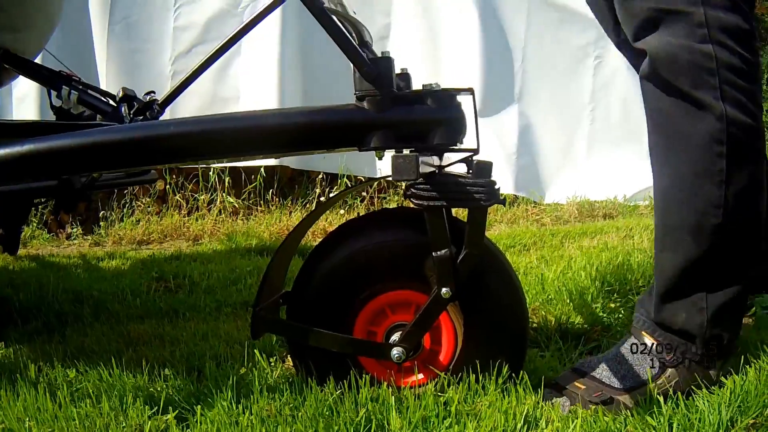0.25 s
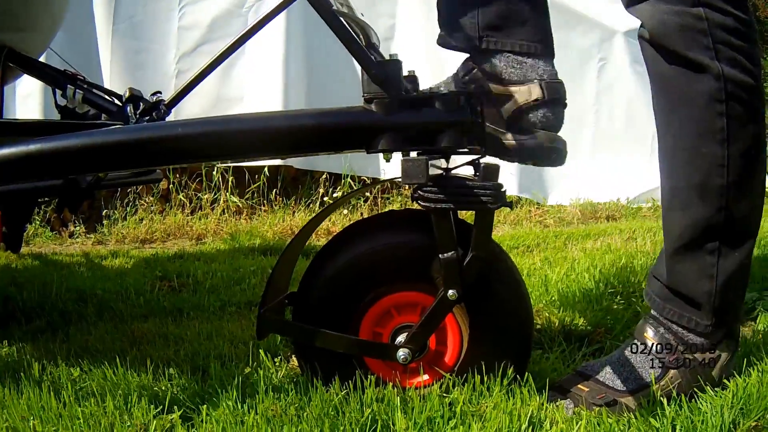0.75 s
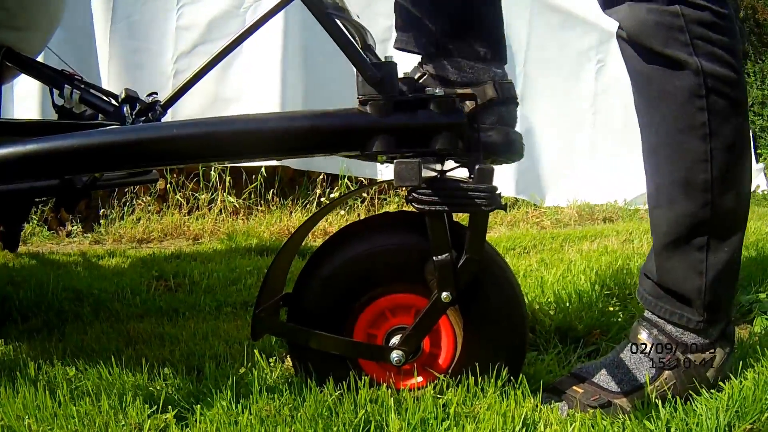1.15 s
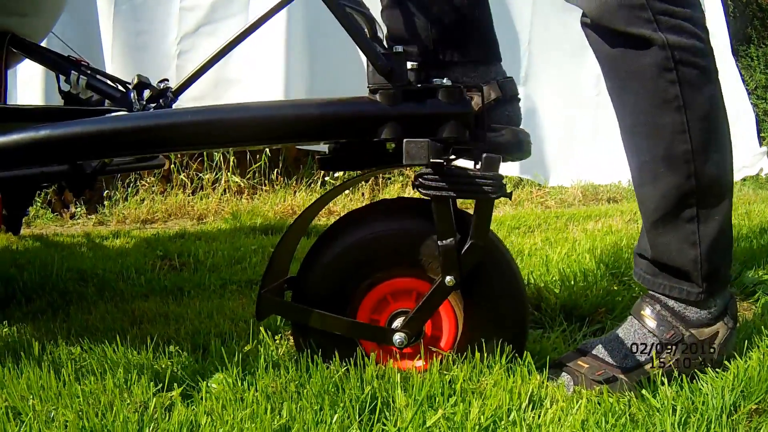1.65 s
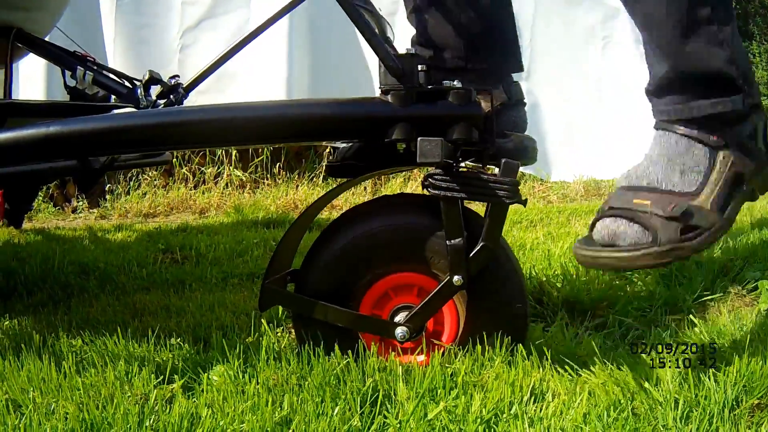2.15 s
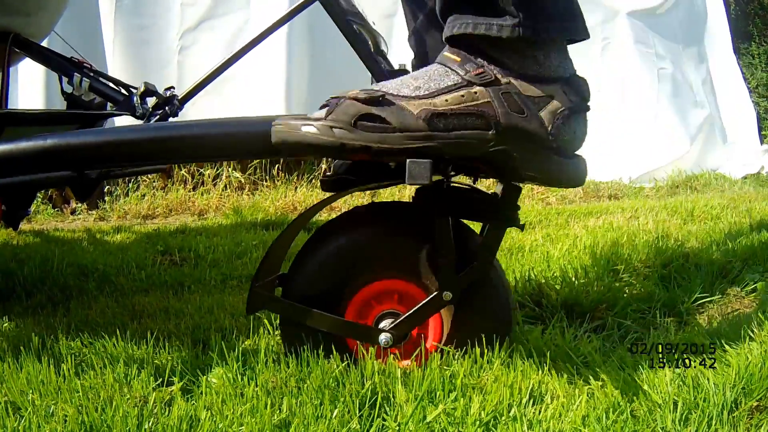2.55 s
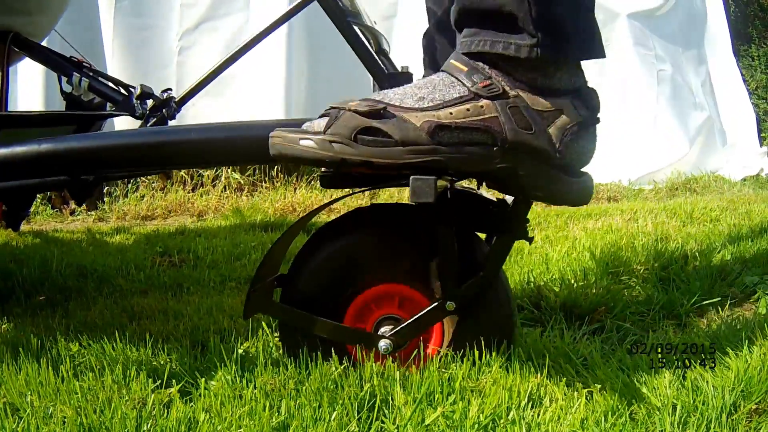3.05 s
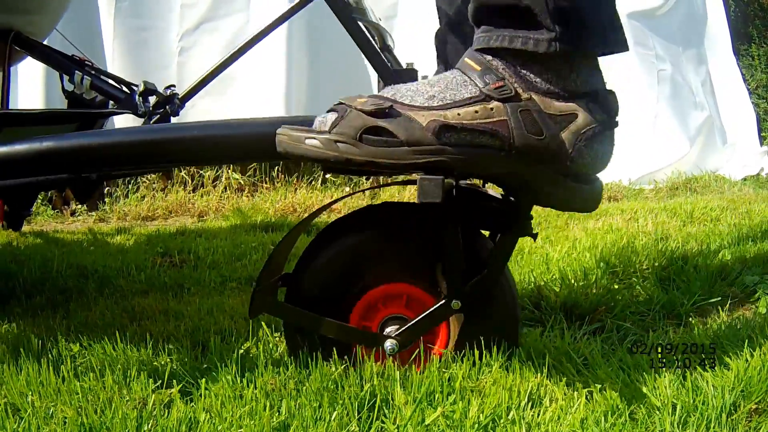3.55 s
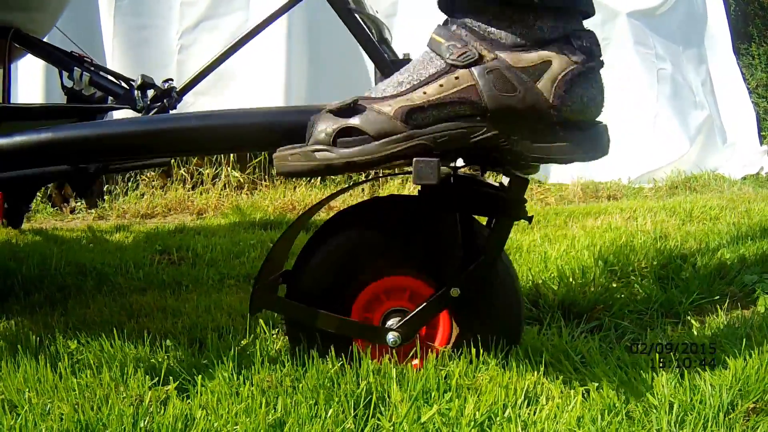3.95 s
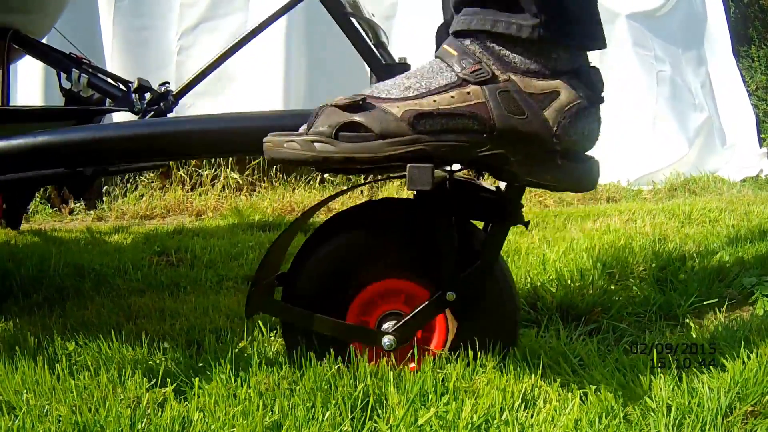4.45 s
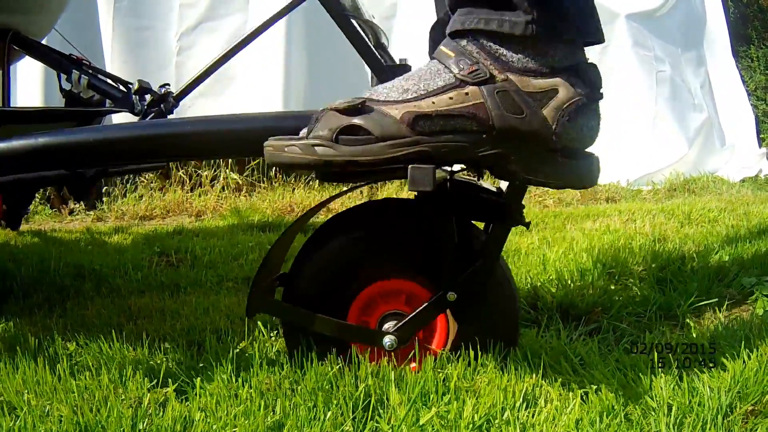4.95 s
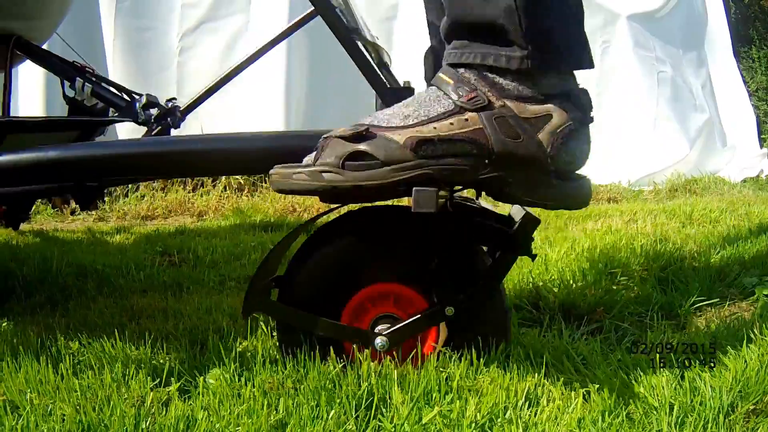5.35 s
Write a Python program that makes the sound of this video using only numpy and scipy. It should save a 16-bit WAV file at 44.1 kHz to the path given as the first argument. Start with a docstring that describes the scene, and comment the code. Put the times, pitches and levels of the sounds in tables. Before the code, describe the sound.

A sprung wheel fork is pumped by a foot outdoors, close and slightly left. A quiet low rumble, soft hiss and faint hum run throughout, while a distant propeller plane drones faintly, sinking in pitch. At about 0.7 seconds a sole lands with a small thump and a bright metallic click. The loudest snap comes at 1.5 seconds, ringing briefly in the steel, and another follows at 2.1 with a short rising squeak. Lighter clicks and tiny squeaks are scattered from 2.5 seconds, thickening into a cluster between 3.5 and 3.8, with a short falling squeak at 4 seconds. From 4.2 to 5.3 the linkage gives soft, hollow knocks while light puffs of wind touch the microphone. A last sharp snap comes at 5.4 seconds. Trousers and sandal rustle faintly with the strokes.

```python
"""A trike's sprung wheel fork, pumped by a foot, snaps and squeaks on a lawn.
The dry spring seat and pivots stick, slip and break free, ringing the coil and the steel frame;
the linkage knocks, and trousers and sandal rustle with the strokes. Far off, a propeller plane
drones past over a faint hum, and a breeze touches the microphone."""
import sys
import numpy as np
from scipy import signal
from scipy.fft import rfft, irfft, next_fast_len
from scipy.io import wavfile
from scipy.ndimage import map_coordinates

SR = 44100
rng = np.random.default_rng(int(sys.argv[2]) if len(sys.argv) > 2 else 0)


def unload_audio(sound):
    """Save the sound as a 16-bit wav file, at the path given as the first command line argument."""
    columns = np.transpose(np.atleast_2d(sound))
    # keep every value between -1 and 1, then stretch to whole-number steps
    steps = np.round(np.clip(columns, -1, 1) * 32767)
    wavfile.write(sys.argv[1], SR, steps.astype(np.int16))


N = 246078
TOP_HZ = 15100


def amp(db):
    """Decibels to gain."""
    return 10 ** (np.asarray(db) / 20)


def unit(x):
    """Scale to rms 1."""
    return x / np.sqrt(np.mean(x ** 2) + 1e-20)


def along(points, hz):
    """Read (frequency, value) points on a log axis."""
    f, v = np.transpose(points)
    return np.interp(np.log(hz + 1), np.log(f + 1), v)


def curves(rows):
    """One automation curve for each column after the time."""
    s, *cols = np.transpose(rows)
    return [np.interp(np.arange(N) / SR, s, c) for c in cols]


def wobble(rate, size=N):
    """A smooth random curve, rate knots a second."""
    knots = rng.standard_normal(int(size * rate / SR) + 4)
    return map_coordinates(knots, [np.arange(size) * rate / SR])


def swells(rows, rest_db):
    """Gain of bell-shaped swells over a resting level."""
    t = np.arange(N) / SR
    power = sum(amp(db) ** 2 * np.exp(-((t - s) / half) ** 2) for s, db, half in rows)
    return np.sqrt(amp(rest_db) ** 2 + power)


def filtered(x, response):
    """EQ x with a gain given as a function of frequency."""
    n = x.shape[-1]
    m = next_fast_len(n + SR // 8)
    return irfft(rfft(x, m) * response(np.fft.rfftfreq(m, 1 / SR)), m)[..., :n]


def noise(spectrum, size):
    """Coloured noise of rms 1."""
    return unit(filtered(rng.standard_normal(size), lambda hz: amp(along(spectrum, hz))))


def add(track, s, sound):
    """Mix a sound into the track from time s."""
    part = track[max(round(s * SR), 0):][:len(sound)]
    part += sound[:len(part)]


# Stereo image of the open air: (frequency [Hz], left-right likeness [1 and up is mono])
AIR_LIKENESS = [(40, 1.2), (150, 0.55), (260, 0.5), (400, 0.15), (950, 0.5), (2380, 0.63), (5980, .5),
                (15000, -0.14)]
# Its balance: (frequency [Hz], left minus right [dB])
AIR_BALANCE = [(60, -11), (150, -0.5), (380, 2.5), (950, 4.5), (2380, 3), (5980, 3), (15000, -2.5)]


def rush(spectrum):
    """Stereo noise of the open air, nearly mono in the bass."""
    def mid_side_gains(hz):
        angle = np.arccos(np.clip(along(AIR_LIKENESS, hz), -1, 1)) / 2
        return np.array([np.cos(angle), np.sin(angle)])

    pair = np.array([noise(spectrum, N), noise(spectrum, N)])
    mid, side = filtered(pair, mid_side_gains)
    stereo = np.array([mid + side, mid - side])
    return unit(filtered(stereo, lambda hz: amp(np.outer([.5, -.5], along(AIR_BALANCE, hz)))))


# Colours of the air's hiss, the far rumble and the wind buffet: (frequency [Hz], gain [dB])
AIR_EQ = [(160, -42), (280, -4.5), (315, 0), (471, -2.5), (671, -3), (1070, -2), (1170, -2), (1610, -1.5),
          (2000, -3.5), (2610, -3.5), (3980, -5), (5470, -1), (7790, -11.5), (13600, -12.5), (15500, -32)]
RUMBLE_EQ = [(20, -1.5), (35, -4.5), (60, 0), (90, -1), (125, 1), (190, -4.5), (250, -10), (330, -23),
             (500, -26.5), (900, -51)]
BUFFET_EQ = [(15, 8), (40, -8), (80, -2), (160, -19), (400, -51), (900, -95)]
# Puffs of wind: (crest time [s], level [dB], half length [s])
WIND_PUFFS = [(4.57, -49, 0.26), (4.86, -44, 0.044), (5.32, -48, 0.042)]


def outdoors(nearest_s=3.04, pass_s=2.4, plane_share=0.57):
    """The bed: even hiss, a far rumble that grows as the plane nears, and wind on the microphone."""
    nearness = 1 / np.hypot(1, (np.arange(N) / SR - nearest_s) / pass_s)
    air = amp(-64 + 0.07 * wobble(8.8)) * rush(AIR_EQ)
    rumble = amp(-58 + 0.12 * wobble(4.86)) * (1 + plane_share * (nearness - 1)) * rush(RUMBLE_EQ)
    breeze = swells(WIND_PUFFS, rest_db=-75) * rush(BUFFET_EQ)
    return air + rumble + breeze


# Tones of the hum: (frequency [Hz], base level [dB])
HUM_TONES = [(112, -66), (123.7, -66), (196, -73)]
# Its fader ride: (time [s], gain [dB])
HUM_RIDE = [(0, -9), (2.5, -4.5), (4.3, 2.5), (5.5, 0.5)]


def hum():
    """A faint far hum that slowly swells, its tones wavering in level and pitch."""
    t = np.arange(N) / SR
    ride_db, = curves(HUM_RIDE)
    track = np.zeros(N)
    for hz, db in HUM_TONES:
        gain = amp(db + ride_db + 1.2 * wobble(2.13))
        track += gain * np.sin(2 * np.pi * hz * t + .25 * wobble(2.56))
    return track


# The fly-by: (time [s], blade rate [Hz], harmonic 1 [dB], harmonic 2 [dB], harmonic 3 [dB])
FLYBY = [(0, 96.4, -67, -76.5, -91), (0.9, 92.5, -67, -71, -86), (1.3, 89.15, -58, -70.5, -87),
         (1.6, 86.9, -53, -68.5, -81), (2.3, 82.1, -64, -59.5, -71.5), (2.6, 78.77, -63.5, -63.5, -64),
         (3.1, 73.17, -64.5, -72, -73), (3.8, 68.36, -54, -71.5, -68.5), (4.4, 65.73, -58, -69, -70.5),
         (5.0, 63.94, -63, -72, -73), (5.45, 63.4, -65, -65, -61.5)]
# The soft rush ahead of the propeller: (crest time [s], level [dB], half length [s])
PROP_WASH = [(1.9, -71, 0.79)]
# Its colour: (frequency [Hz], gain [dB])
WASH_EQ = [(120, -23), (240, -1), (450, 0), (620, -11), (850, -6.5), (1500, -11), (3000, -36)]


def plane():
    """The propeller's drone sinks in pitch as it passes; its harmonics waver in the moving air."""
    blade_hz, *levels = curves(FLYBY)
    phase = 2 * np.pi * np.cumsum(blade_hz) / SR
    drone = sum(amp(db + 0.45 * wobble(6)) * np.sin(k * phase + 0.1 * wobble(2.96))
                for k, db in enumerate(levels, 1))
    wash = swells(PROP_WASH, rest_db=-101) * rush(WASH_EQ)
    return drone * amp([[-1.5], [2]]) + wash


# The legs step up, then brush with the strokes: (crest time [s], level [dB], half length [s])
LEG_BRUSHES = [(0.57, -63.5, 0.19), (1.474, -68, 0.12), (2.172, -59, 0.038), (2.345, -61, 0.0477),
               (2.78, -65.5, .04), (3.26, -61, 0.028), (3.76, -61.5, 0.052), (4.29, -65, 0.042),
               (4.79, -59, 0.026), (5.29, -57.5, 0.03)]
# Colour of the cloth: (frequency [Hz], gain [dB])
CLOTH_EQ = [(880, -53.5), (1500, -40), (2040, -6.5), (3120, -5.5), (4200, -2.5), (5500, 6), (6300, -0.5),
            (8500, -13), (13400, -21.5), (15000, -58)]


def rustle():
    """Cloth and sandal rub in fine grains while the leg moves."""
    motion = swells(LEG_BRUSHES, rest_db=-74.5)
    grains = noise(CLOTH_EQ, N) * amp(2.1 * wobble(500) + 2.1 * wobble(45))
    return motion * unit(grains)


# Knocks of the linkage: (time [s], relative level [dB])
LINKAGE_KNOCKS = [(2.543, -53), (3.165, -70), (4.252, -49), (4.329, -52), (4.473, -50), (4.818, -47.5),
                  (4.932, -47.5), (5.002, -51.5), (5.317, -50)]
# Their colour: (frequency [Hz], gain [dB])
LINKAGE_EQ = [(150, 9), (450, -3), (700, -1.5), (1050, -2), (1800, -8), (4000, -11), (8000, -14),
              (15000, -39)]
# The sole lands or pushes on the frame: (time [s], pitch [Hz], level [dB], t60 [s])
SOLE_THUMPS = [(.679, 317, -38, 0.023), (.692, 200, -42, 0.06), (2.543, 397, -51, 0.023),
               (4.933, 550, -58, 0.048)]


def knocks(note_hz=1010, knock_t60=0.052):
    """The linkage takes up its play with dull, hollow knocks; the rubber sole lands with a thump."""
    track, t = np.zeros(N), np.arange(SR // 5) / SR
    note = amp(-10) * np.sin(2 * np.pi * note_hz * t)
    envelope = amp(-60 * t / knock_t60) * (1 - np.exp(-t / 0.00057))
    for s, db in LINKAGE_KNOCKS:
        clack = amp(-3.5) * noise(LINKAGE_EQ, len(t))
        add(track, s, amp(db) * (clack + note) * envelope)
    for s, hz, db, t60 in SOLE_THUMPS:
        thump = amp(db - 60 * t / t60) * np.sin(2 * np.pi * hz * t)
        add(track, s, thump * (1 - np.exp(-t / 0.00011)))
    return track


# Colour of the ringing steel: (frequency [Hz], gain [dB])
STEEL_EQ = [(180, -53), (300, -22), (620, -22.5), (985, -13.5), (1420, -12), (2520, -10), (3130, -7),
            (3750, -6.5), (5300, -0.5), (7020, -6), (7620, -9.5), (10300, -20.5), (12500, -25),
            (15500, -46)]


def steel_shimmer(t):
    """The steel's many close modes blur into bright noise."""
    return noise(STEEL_EQ, len(t))


# The steel frame's resonances: (frequency [Hz], width [Hz], relative level [dB])
FRAME_MODES = [(1027, 120, -20), (1724, 140, -13.5), (2146, 91, -16), (2550, 110, -8.5), (2815, 110, -10),
               (3416, 100, -8), (3970, 90, -7.5), (4460, 110, -8.5), (4830, 130, -6), (5180, 180, -1),
               (5740, 210, -0.5), (6010, 120, -3.5), (6410, 100, -7), (6930, 190, -3), (8260, 230, -8.5),
               (9300, 190, -15), (10330, 150, -22), (12100, 120, -16)]


def frame_ring(t, scatter_db=2.5, detune=.004):
    """The frame's modes, struck with new strengths and detuned by the load; wide ones fade sooner."""
    hz, width, db = np.transpose(FRAME_MODES)[:, :, None]
    level = amp(db + scatter_db * rng.standard_normal(hz.shape))
    loaded_hz = hz * (1 + detune * rng.standard_normal(hz.shape))
    waves = np.sin(2 * np.pi * (loaded_hz * t + rng.random(hz.shape)))
    return np.sum(level * np.exp(-.15 * width * t) * waves, axis=0) / np.sqrt(np.sum(level ** 2) / 2)


# Squeak cues: (time [s], length [s], start pitch [Hz], turn pitch [Hz], end pitch [Hz],
# place of the turn [0-1], relative level [dB], overtone edge [dB], second harmonic [dB], roughness [0-1])
PIVOT_SQUEAKS = [(1.499, 0.0066, 1520, 1485, 1400, 0.9, -39, 4, 11, 0.6),
                 (2.092, 0.046, 859, 1272, 1310, 0.72, -48, -9.5, 11, 0.18),
                 (2.552, 0.015, 4510, 2970, 2690, 0.48, -47.5, -25, -2, 0.54),
                 (2.639, 0.019, 1870, 2244, 2200, 0.54, -53.5, -7, 2, 0.37),
                 (3.544, 0.026, 1620, 994, 1360, 0.44, -51, -9, 2, 0.06),
                 (3.714, 0.017, 2440, 3450, 3150, 0.83, -48, -22, -3, 0.2),
                 (3.722, 0.024, 4100, 4420, 3640, 0.2, -54, -21, 0, 0.4),
                 (3.747, 0.014, 3310, 3330, 2980, 0.28, -47.5, -4, 3, 0.2),
                 (4.0396, 0.04, 1244, 1150, 862, .72, -37.5, 2, -1.5, 0.26)]
# Colour of a slip: (frequency [Hz], gain [dB])
SLIP_EQ = [(400, -47), (900, -6.5), (1200, -10), (1500, -17), (2200, -12.5), (2900, -23.5), (3500, -4),
           (4000, -7), (4550, 1), (5200, -0.5), (5700, 1), (6200, -1), (6900, -13), (8400, -13),
           (10000, -21), (15000, -31)]


def squeaks(jitter=.05, wander=.018, scatter_db=2.4, grip_crest=.58, sag_db=7.5, edge_per_grip=.4):
    """The pivot sticks and slips in gliding pulses; more grip makes them louder, sharper, less even."""
    track = np.zeros(N)
    k = np.arange(1, 14)[:, None]  # harmonic numbers
    for s, length, start_hz, turn_hz, end_hz, turn, db, edge_db, second_db, rough in PIVOT_SQUEAKS:
        size = round(length * SR)
        progress = np.linspace(0, 1, size)
        glide_hz = np.interp(progress, [0, turn, 1], [start_hz, turn_hz, end_hz])
        grip_db = -sag_db * (2 * (progress - grip_crest)) ** 2  # builds, then lets go
        waver = wander * wobble(160, size) + jitter * np.sqrt(2 * rough) * wobble(866, size)
        hz = glide_hz * (1 + amp(grip_db) * waver)
        cycles = np.cumsum(hz) / SR
        bite_db = (k > 1) * (edge_db + edge_per_grip * grip_db) + (k == 2) * second_db
        gains = amp(along(SLIP_EQ, k * hz) + bite_db)
        lag = np.arctan((k * hz - 5200) / 1100)  # the seat's broad resonance draws out each pulse
        pulses = np.sum(gains * (k * hz < TOP_HZ) * np.cos(2 * np.pi * k * cycles - 2 * lag), axis=0)
        pulses /= np.sqrt(np.sum(gains ** 2, axis=0) / 2)
        # dry surfaces scrape once in each slip
        bursts = rng.standard_normal(size) * np.exp(-3 * (cycles % 1))
        scrape = unit(filtered(bursts, lambda f: amp(along(SLIP_EQ, f))))
        rasp = rough * amp(grip_db)
        voice = np.sqrt(1 - rasp) * pulses + np.sqrt(rasp) * scrape
        envelope = amp(db + grip_db + scatter_db * wobble(1126, size)) * signal.windows.tukey(size, .04)
        add(track, s, voice * envelope)
    # the slips also keep the frame ringing
    t = np.arange(SR // 10) / SR
    ring = steel_shimmer(t) * amp(-60 * t / 0.095)
    return amp(-4.5) * track + amp(-26.0) * signal.fftconvolve(track, ring / np.linalg.norm(ring))[:N]


# The pivots break free: (time [s], relative level [dB], low EQ [dB], top EQ [dB],
# coil ping pitch [Hz], ping level within the snap [dB])
PIVOT_SNAPS = [(0.677, -47, 0, 0, 5840, -12), (0.6802, -30, -0.5, 2, 4910, -5),
               (0.6968, -45.5, 14.5, -11, 5400, -10), (1.483, -40.5, 10, -4, 6930, -12),
               (1.506, -19, -3, -3.5, 5220, -7), (1.9079, -46, -19, -1, 5800, -9),
               (2.0437, -37.5, 0, -2, 6150, -7), (2.0749, -24.5, 0.5, -2, 5170, -1.5),
               (2.9257, -48.5, 7, -2, 5400, -14), (2.991, -50.5, -11, -10, 5500, -8),
               (3.1594, -40, 13.5, 1, 5910, 0.5), (3.447, -51.5, -7, -3, 5935, -10),
               (3.5039, -35, 0, -0.5, 4920, -9), (3.546, -46.5, 13, -17, 5500, -10),
               (3.695, -38, 6.5, 2.5, 5730, -2), (3.7593, -26.5, 1, -2.5, 4460, -14),
               (3.7738, -35.5, 9.5, -17, 5160, -13), (4.4827, -47, 7, -1, 5500, -10),
               (5.423, -22.5, -2, -2.5, 5780, -13)]
# Colour of the bright tick at first contact: (frequency [Hz], gain [dB])
TICK_EQ = [(2000, -34), (5000, 1), (7500, 11), (10000, -8.5), (15000, -12)]


def snaps(ring_t60=0.059, ping_t60=0.11, crack_t60=0.0046, tick_t60=0.0071, hard_db=-26):
    """Each release cracks and chatters, ringing frame and coil; one coil mode stands out as a ping."""
    track, t = np.zeros(N), np.arange(SR // 5) / SR
    attack = 1 - np.exp(-t / 0.000087)
    for s, db, low_db, top_db, ping_hz, ping_db in PIVOT_SNAPS:
        ring = amp(-5.0) * frame_ring(t) + amp(-4.5) * steel_shimmer(t)
        # ping and crack decay on top of the body's shared fade
        ping = amp(ping_db - 60 * t / ping_t60) * np.sin(2 * np.pi * ping_hz * t)
        crack = amp(-15.5 - 60 * t / crack_t60) * rng.standard_normal(len(t))
        colour = [(1300, low_db), (2000, low_db / 3), (3000, 0), (6000, 0), (9000, top_db)]
        body = filtered(ring + ping + crack, lambda hz: amp(along(colour, hz)))
        # hard releases break cleanly: the chatter's hold halves with each dB above hard_db
        chatter_s = 0.0064 * .5 ** max(db - hard_db, 0)
        fade = amp(-60 * (np.hypot(t, chatter_s) - chatter_s) / ring_t60)
        flutter = amp(0.4 * wobble(730, len(t)))
        tick = amp(-2.5 + top_db - 60 * t / tick_t60) * noise(TICK_EQ, len(t))
        add(track, s, amp(db - 7) * (body * fade * flutter + tick) * attack)
    return track


def reflections(x, t60=0.16):
    """A short answer from a tent wall and the ground, different at each ear."""
    t = np.arange(SR // 4) / SR
    tail = rng.standard_normal((2, len(t))) * amp(-60 * t / t60) * (1 - np.exp(-t / 0.0033))
    return signal.fftconvolve(x[None], tail / np.linalg.norm(tail[0]), axes=1)[:, :N]


def scene():
    """The fork sits close and to the left, with a touch of reverb, over the outdoor bed."""
    fork = snaps() + squeaks() + knocks() + rustle()
    foreground = fork * amp([[2.4], [-3.4]]) + amp(-13.0) * reflections(fork)
    return foreground + plane() + hum() + outdoors()


# DC offset, a row each for left and right: (offset [full scale])
DC_OFFSET = [
    [.0058],
    [.0145],
]


def record(dry):
    """A brick-wall high cut; each channel rests slightly off zero."""
    return filtered(dry, lambda hz: hz < TOP_HZ) + DC_OFFSET


dry = scene()
out = record(dry)
unload_audio(out)
```